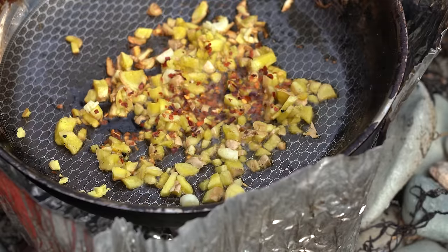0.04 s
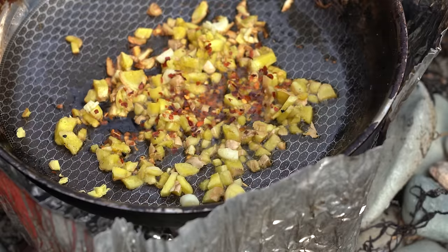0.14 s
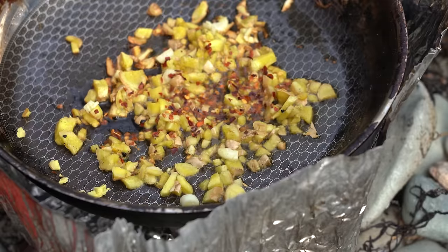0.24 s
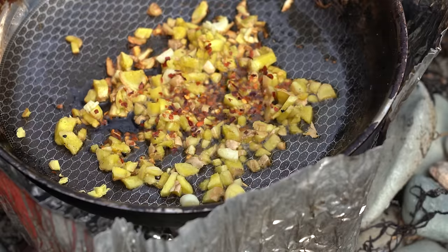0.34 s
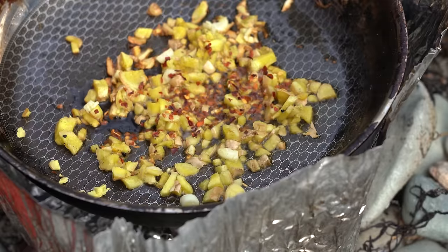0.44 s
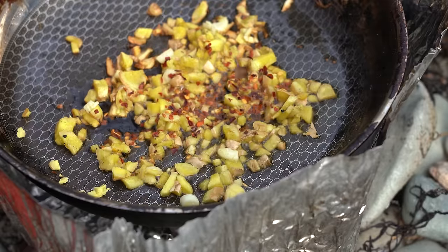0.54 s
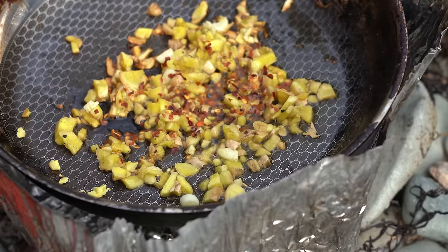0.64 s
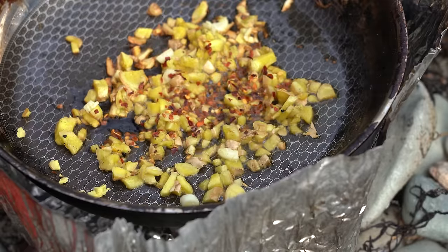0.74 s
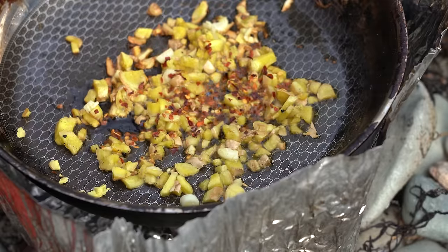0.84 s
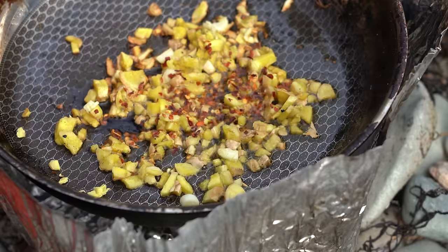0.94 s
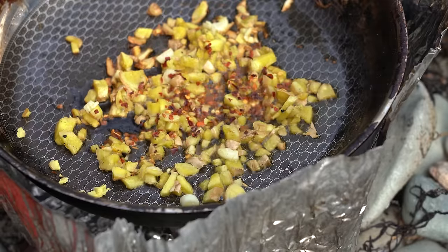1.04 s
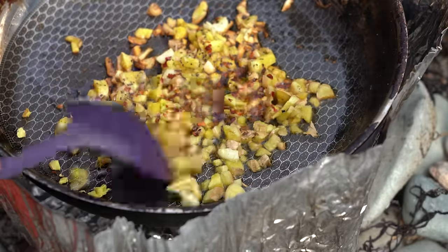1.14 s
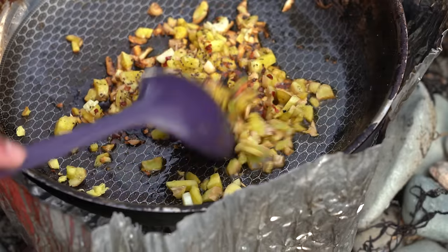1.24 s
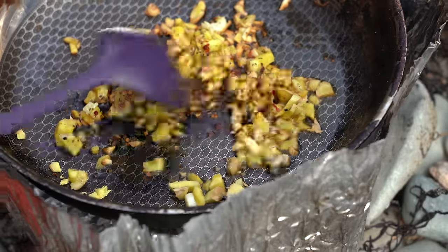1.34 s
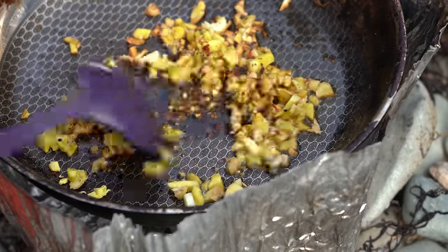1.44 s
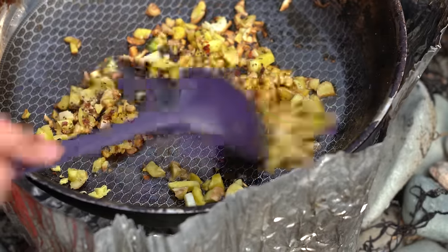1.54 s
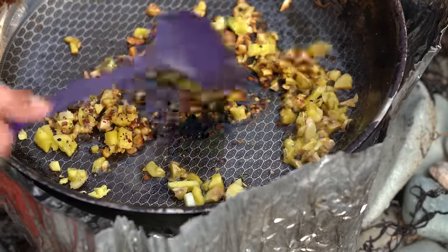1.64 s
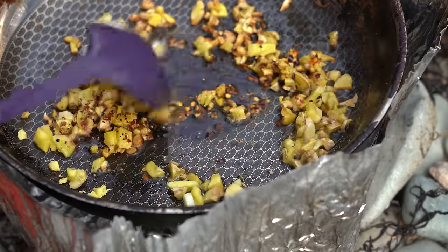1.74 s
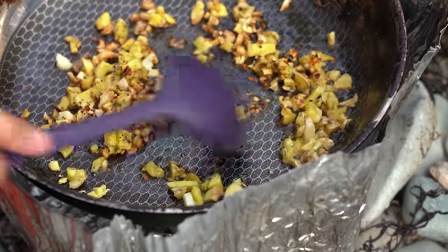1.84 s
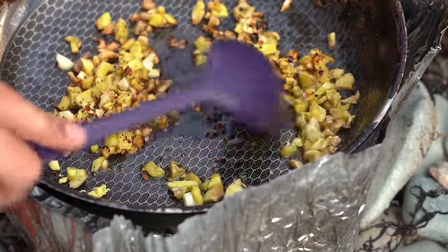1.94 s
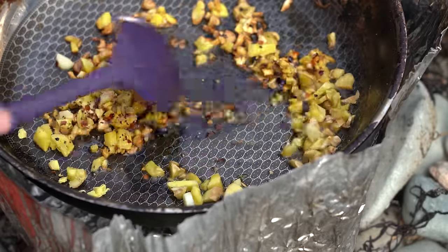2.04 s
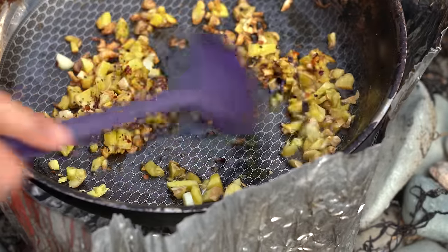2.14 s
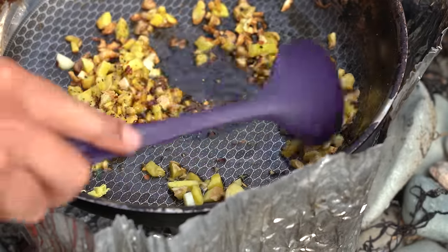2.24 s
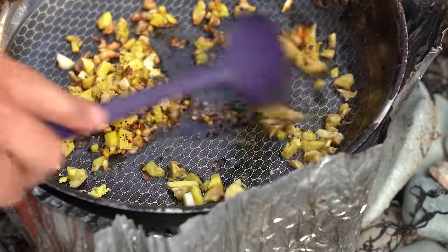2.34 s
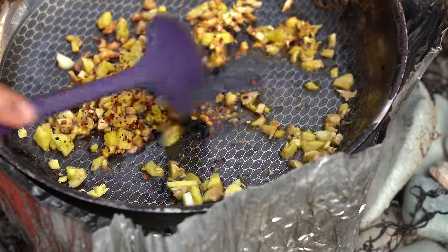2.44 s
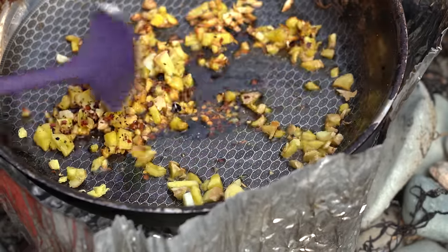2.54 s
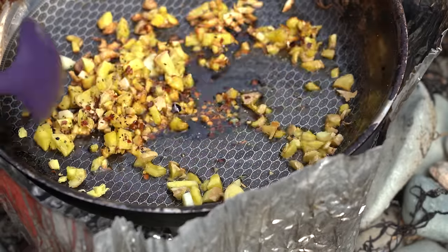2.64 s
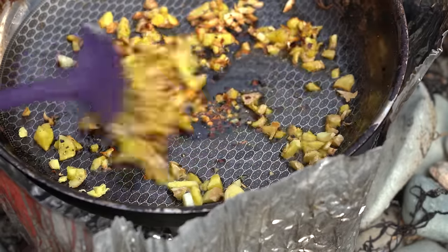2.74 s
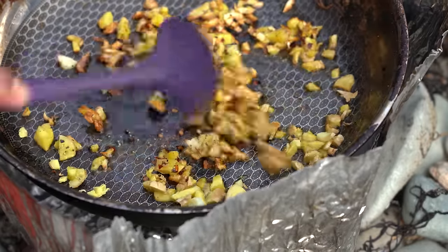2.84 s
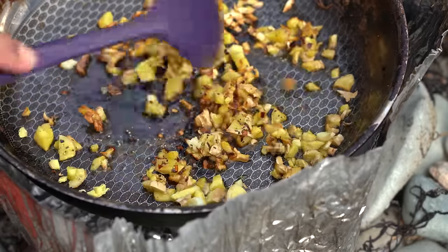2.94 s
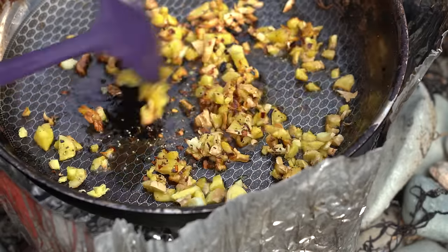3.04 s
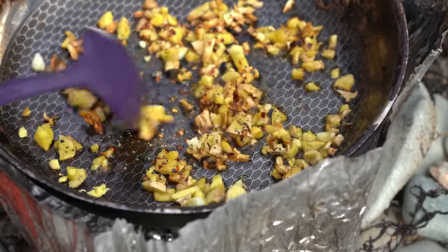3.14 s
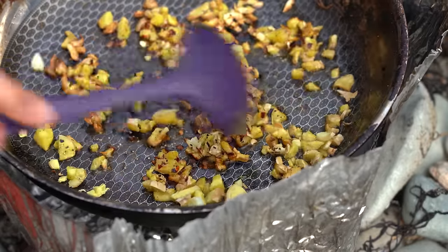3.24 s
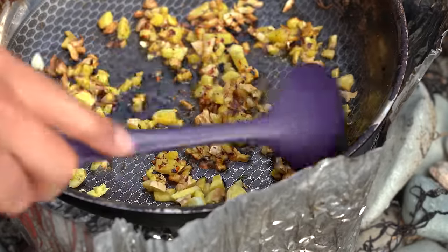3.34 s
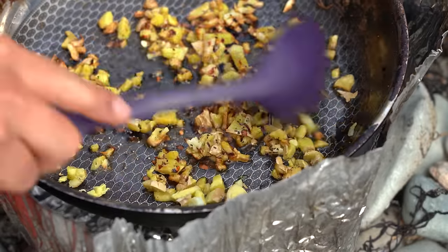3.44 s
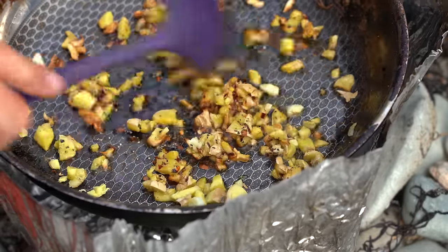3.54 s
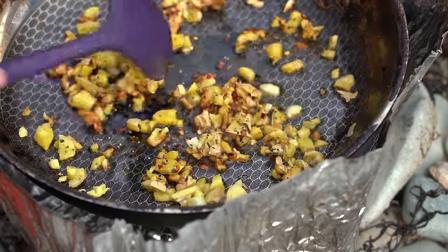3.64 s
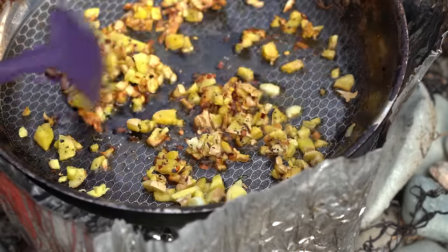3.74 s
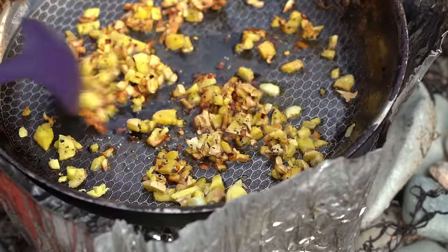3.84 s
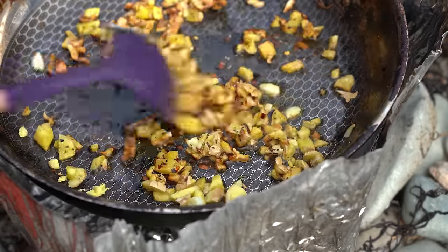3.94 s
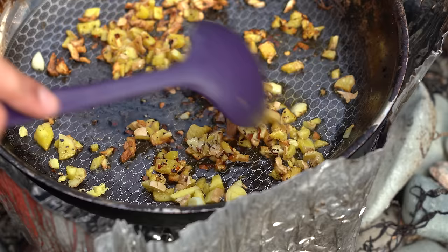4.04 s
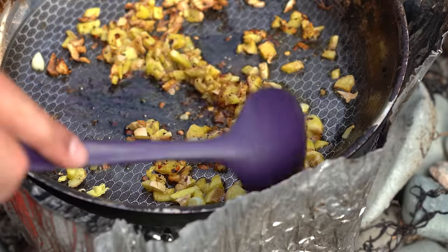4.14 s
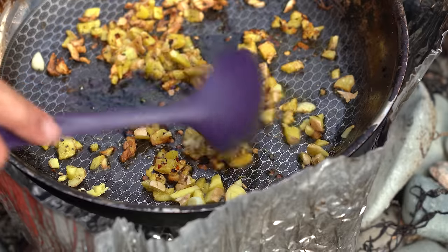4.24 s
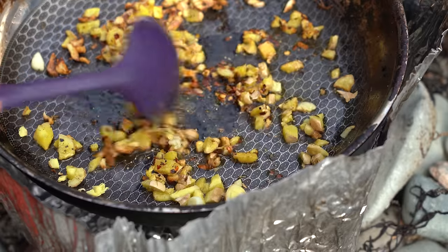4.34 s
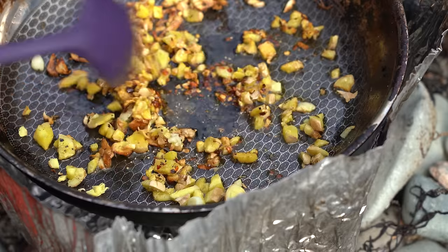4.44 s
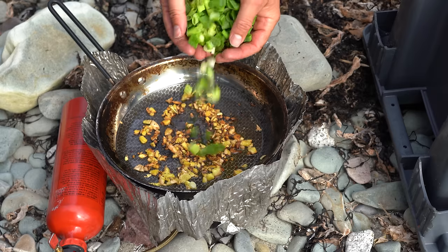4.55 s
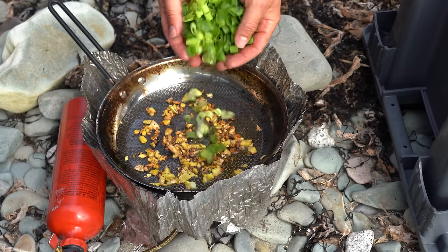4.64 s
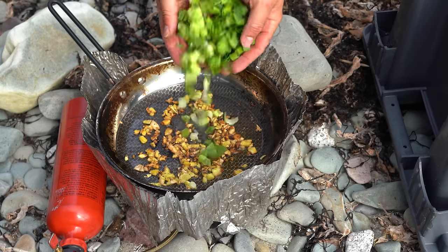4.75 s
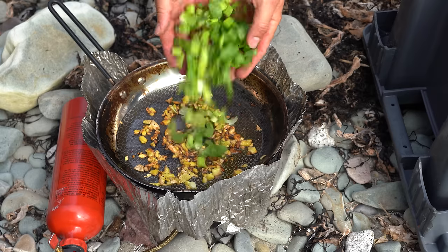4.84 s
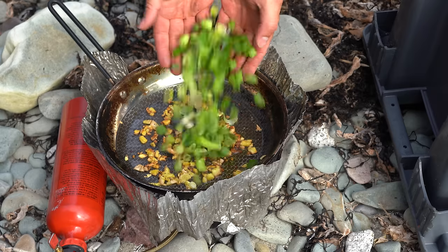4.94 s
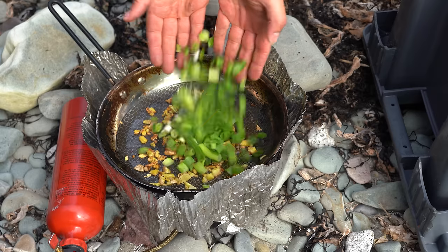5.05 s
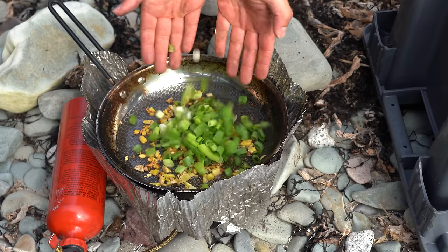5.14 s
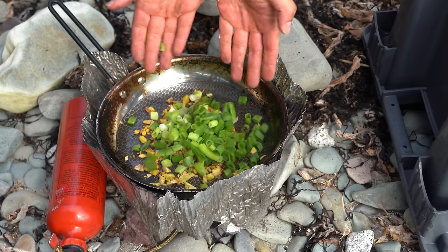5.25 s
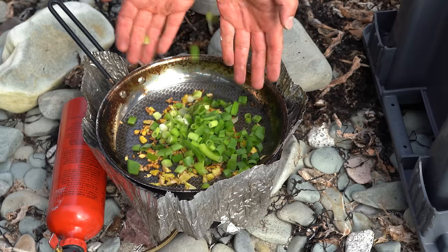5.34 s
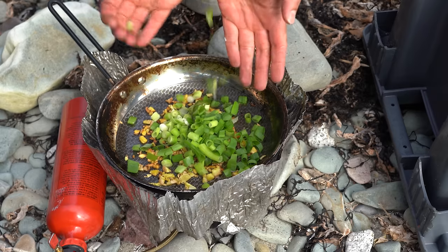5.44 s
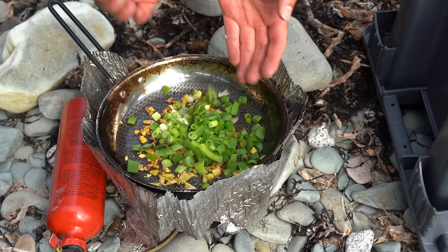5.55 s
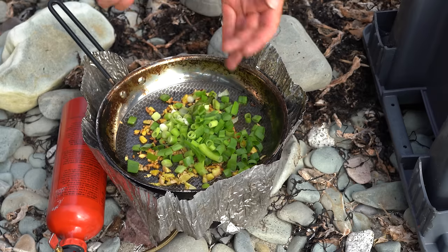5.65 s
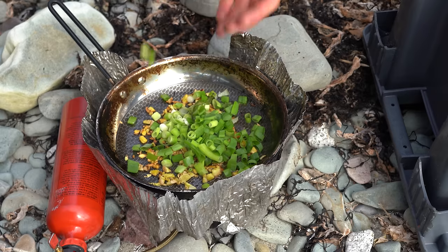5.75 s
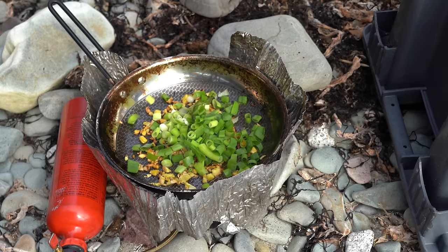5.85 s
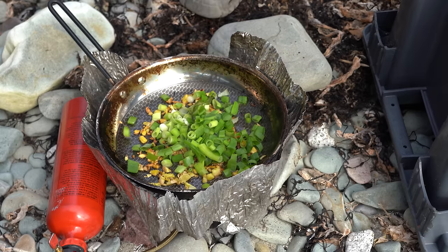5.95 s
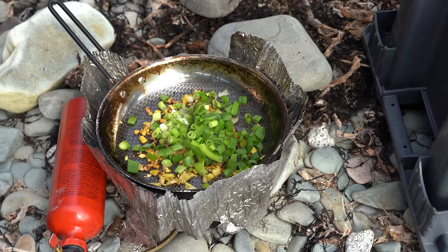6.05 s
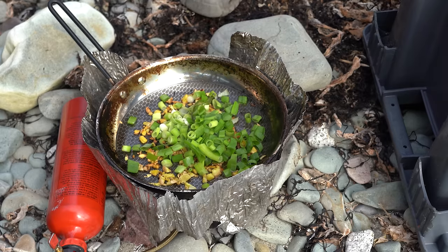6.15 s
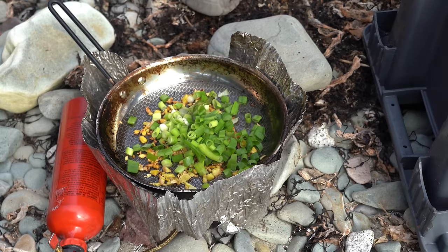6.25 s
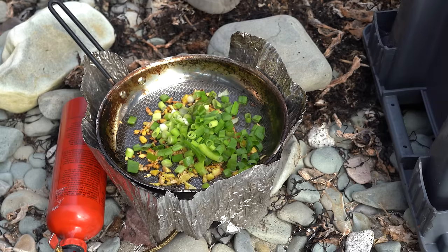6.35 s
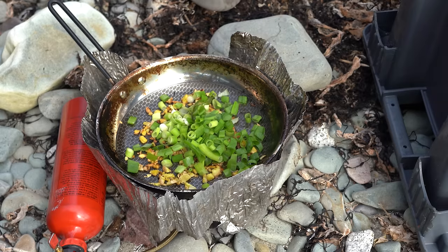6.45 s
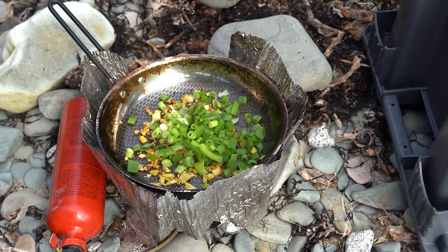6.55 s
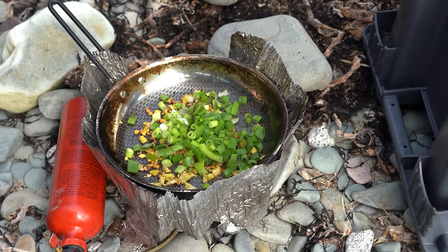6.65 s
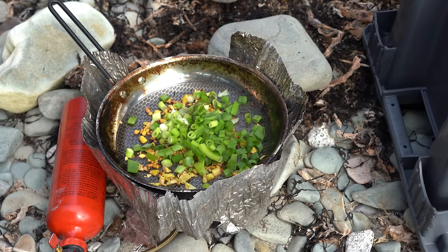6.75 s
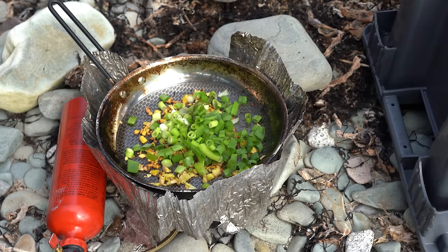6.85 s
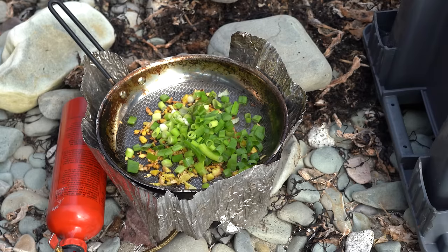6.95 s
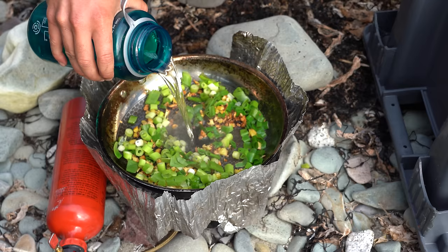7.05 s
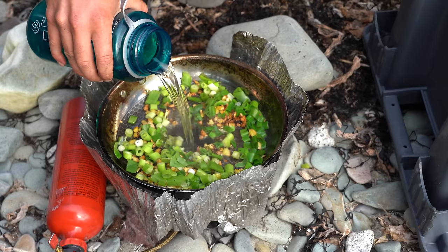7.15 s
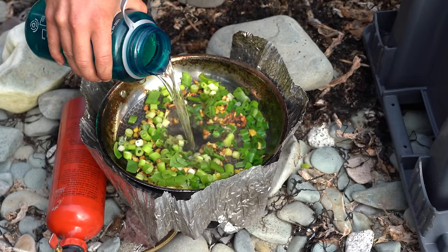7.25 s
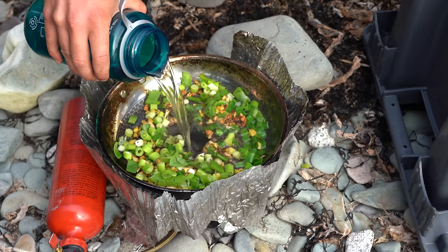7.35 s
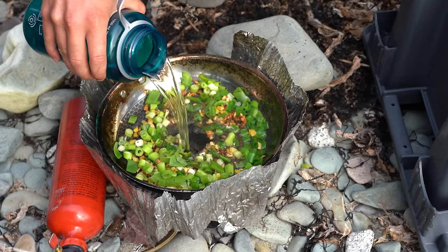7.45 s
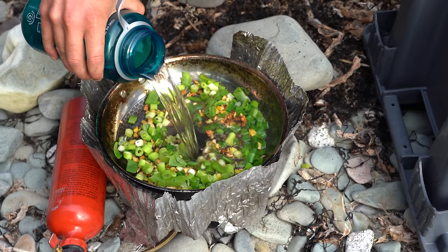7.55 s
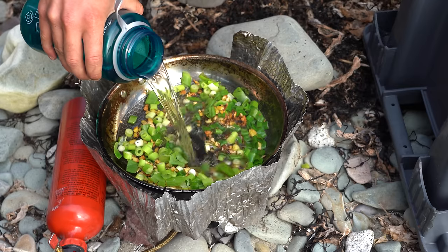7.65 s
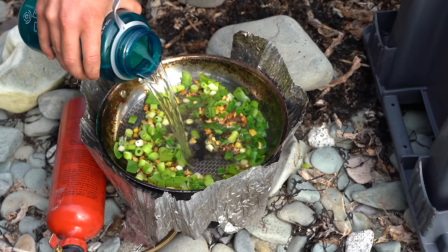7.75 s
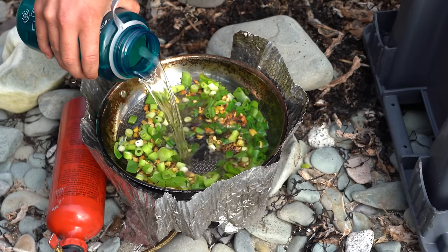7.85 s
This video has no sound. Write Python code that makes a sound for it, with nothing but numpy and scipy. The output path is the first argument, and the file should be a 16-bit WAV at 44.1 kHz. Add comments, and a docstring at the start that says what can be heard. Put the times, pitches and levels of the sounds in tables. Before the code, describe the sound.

Outdoors, close to a camp stove, chopped vegetables sizzle softly in a steel pan with small pops of oil, over the steady low roar of the flame. From about 1.2 to 4.4 seconds a plastic spoon stirs in quick strokes, knocking and scraping the textured pan so that it rings briefly. At about 4.7 seconds wet peppers drop in and the sizzle turns louder and brighter, full of sharp crackles, with one strong pop near 4.9 seconds. At about 7.1 seconds poured water hits the hot pan and flashes into a dense, louder hiss that lasts to the end, near 8 seconds. Light wind rumbles on the microphone throughout and gusts hardest in the last second. A small bird chirps faintly off to the left, a little more than once a second, over a very faint, wide, distant hum.

```python
"""Frying on a camp burner

Outdoors, close to the stove, a light wind on the microphone. Chopped vegetables fry in a steel pan
over a roaring flame, tiny bubbles bursting in the oil. A plastic spoon knocks and scrapes the textured
pan and sets it ringing. Wet peppers drop in and crackle, then poured water flashes to steam.
A small bird chirps some way off to the left, over a wide, distant hum."""
import sys
import numpy as np
from scipy import signal
from scipy.fft import rfft, irfft, next_fast_len
from scipy.io import wavfile

SR = 44100
rng = np.random.default_rng(int(sys.argv[2]) if len(sys.argv) > 2 else 0)


def to_wav(s):
    """Save 16-bit WAV."""
    ch = np.atleast_2d(s).T  # columns
    pcm = np.round(np.clip(ch, -1, 1) * 32767)  # PCM
    wavfile.write(sys.argv[1], SR, pcm.astype(np.int16))


N = 348831


def from_db(db):
    """Decibels to gain."""
    return 10 ** (np.asarray(db) / 20)


def unit_rms(x):
    """Scale to unit rms."""
    return x / np.sqrt(np.mean(x ** 2) + 1e-20)


def curves(rows, outside=None):
    """Join rows that begin with a time in seconds into one curve for each further column."""
    seconds, *columns = np.transpose(rows)
    return [np.interp(np.arange(N) / SR, seconds, column, outside, outside) for column in columns]


def colour(x, spectrum):
    """Shape by a spectrum joined on a log-frequency axis; unit rms."""
    size = next_fast_len(N)
    hz, db = np.transpose(spectrum)
    log_bins = np.log(np.arange(1, size // 2 + 2) * SR / size)
    gain = from_db(np.interp(log_bins, np.log(hz), db))
    return unit_rms(irfft(rfft(x, size) * gain, size)[:N])


def drift(rate_hz):
    """A slow random wander of unit spread."""
    step = 40
    r = np.exp(-2 * np.pi * rate_hz * step / SR)
    slow = signal.lfilter([1], [1, -2 * r, r * r], rng.standard_normal(N // step + 2002))[2000:]
    return np.interp(np.arange(N) / step, np.arange(len(slow)), unit_rms(slow))


def resonance(x, hz, width_hz):
    """Two-pole resonance with gain 1 at its peak."""
    r = np.exp(-np.pi * width_hz / SR)
    feedback = [1, -2 * r * np.cos(2 * np.pi * hz / SR), r * r]
    return signal.lfilter(np.array([1, 0, -1]) * (1 - r * r) / 2, feedback, x + 1e-18)


def clicks(per_s, uneven_db):
    """Random clicks of random sign, most small and a few large; unit rms."""
    sizes = from_db(uneven_db * np.minimum(rng.exponential(1, N), 3.6)) * rng.choice([-1, 1], N)
    return unit_rms(sizes * (rng.random(N) < per_s / SR))


def lift_lows(x, db, below_hz):
    """Raise or lower what lies under a frequency by a curve of dB."""
    lows = signal.sosfiltfilt(signal.butter(2, below_hz, fs=SR, output="sos"), x)
    return x + (from_db(db) - 1) * lows


def sizzle(levels, spectrum, wet_db, per_s, uneven_db, hiss_db, clump_db, patchy_db, octaves):
    """Tiny bubbles burst in clumps, each loud around a pitch of its own, over a fine hiss of steam."""
    bursts = clicks(per_s * from_db(clump_db * drift(25)), uneven_db)
    at = np.flatnonzero(bursts)
    log_pitch = rng.uniform(np.log2(600), np.log2(18000), N)[at]
    steam = rng.standard_normal((2, N))
    reach = octaves * from_db(rng.uniform(-10.5, 5.8, N)[at])   # the sharpest bursts spread widest
    edges_hz = np.geomspace(450, 19000, num=13)
    out = np.zeros(N)
    for k, (low, high) in enumerate(zip(edges_hz, edges_hz[1:])):
        drive = from_db(hiss_db + patchy_db * drift(42)) * steam[k % 2]
        octaves_off = np.log2(low * high) / 2 - log_pitch
        drive[at] += bursts[at] * np.exp(-(octaves_off / reach) ** 2)
        out += signal.sosfilt(signal.butter(2, [low, high], "band", fs=SR, output="sos"), drive)
    # wetness deepens the sizzle: wet_db lifts the lows at the start and at the end of the stage
    lows_db, = curves([(levels[0][0], wet_db[0]), (levels[-1][0], wet_db[1])])
    level_db, = curves(levels, outside=-120)
    return from_db(level_db) * lift_lows(colour(out, spectrum), lows_db, below_hz=2000)


# The sizzle at each stage, close to the microphone. Each row: time in seconds, level in dB.
OIL_LEVELS = [(0.0, -48.5), (1.3, -47.5), (2.0, -46), (2.96, -43.5), (3.21, -46), (3.45, -43),
              (4.05, -45.5), (4.66, -45.5)]
PEPPER_LEVELS = [(4.655, -57), (4.665, -37), (4.7, -36.5), (4.75, -41.5), (4.86, -40), (5.03, -33.5),
                 (5.2, -32.5), (5.4, -33.5), (5.55, -32.5), (5.82, -30), (6.0, -31), (6.3, -31.5),
                 (6.6, -34), (7.1, -34)]
WATER_LEVELS = [(7.09, -35), (7.11, -24.5), (7.17, -25), (7.27, -22.5), (7.5, -25.5), (7.6, -24),
                (7.91, -26)]
# The tone of each stage. Each row: frequency in Hz, relative level in dB.
OIL_SPECTRUM = [(470, -43), (800, -9), (852, -3), (989, -0.5), (1090, -3), (1970, -6), (2090, -4),
                (3950, -4), (6040, -6), (8460, -4.5), (10500, -14), (13800, -12.5), (15800, -23)]
PEPPER_SPECTRUM = [(470, -11), (800, -7.5), (1210, -6), (1890, -9), (2170, -1.5), (2460, -5.5),
                   (2860, -0.5), (6350, -1), (8050, 1.5), (9710, -4.5), (10600, -12.5), (13900, -8),
                   (15800, -19)]
WATER_SPECTRUM = [(290, -45), (500, -7), (522, -6.5), (1220, -0.5), (2180, 1.5), (2710, -2.5), (3570, 0),
                  (5580, -1.5), (6180, -3), (8370, 0.5), (10900, -12.5), (13900, -11), (15800, -22)]


def frying():
    """Hot oil, then wet peppers, then poured water: each stage bubbles faster than the last."""
    oil = sizzle(OIL_LEVELS, OIL_SPECTRUM, wet_db=(1.5, -1.5), per_s=600,
                 uneven_db=6.2, hiss_db=-6, clump_db=4, patchy_db=1, octaves=0.6)
    peppers = sizzle(PEPPER_LEVELS, PEPPER_SPECTRUM, wet_db=(1.5, 1), per_s=2500,
                     uneven_db=9, hiss_db=-9, clump_db=3, patchy_db=1.4, octaves=0.95)
    water = sizzle(WATER_LEVELS, WATER_SPECTRUM, wet_db=(-7, 5), per_s=5100,
                   uneven_db=6, hiss_db=-5, clump_db=1, patchy_db=1.2, octaves=0.85)
    return oil + peppers + water


# The loudest single bubbles of fat and water in the pan.
# Each row: start in seconds, level in dB, pitch in Hz, crack in dB relative to the ring.
BUBBLES = [(0.581, -25.5, 2000, -22), (0.809, -31, 1240, -5), (0.835, -29.5, 2220, -4.5),
           (0.8916, -21, 4900, -27), (1.0113, -16.5, 4200, -23), (2.172, -31.5, 3810, -0.5),
           (2.363, -24.5, 4360, -6), (2.8878, -19.5, 8250, -12), (3.1797, -22, 4250, -6.5),
           (3.243, -29.5, 2360, -2), (3.3672, -24, 2440, -7), (3.4147, -18, 7000, -17),
           (4.58, -11.5, 1440, -39), (4.6704, -11.5, 9580, -29), (4.7226, -11, 7400, -12),
           (4.785, -19, 7850, -18), (4.802, -17.5, 7380, -16), (4.8605, -21, 4440, -9),
           (4.8883, -16, 8160, -13), (4.9155, 2.5, 7650, -13), (4.999, -18, 6890, -19),
           (5.1018, -10, 7100, -14), (5.1653, -15, 3190, -17), (5.1961, -12.5, 5650, -10),
           (5.2294, -17, 8430, -11), (5.3137, -12.5, 2900, -21), (5.3582, -20, 8500, -6),
           (5.4088, -13, 3220, -18), (5.446, -15, 7200, -15), (5.4964, -13, 8220, -11),
           (5.5278, -13, 2920, -6.5), (5.5746, -16, 4490, -9), (5.6575, -11.5, 5600, -15),
           (5.6904, -15, 3010, -16), (5.7463, -11, 1550, -13), (5.7745, -5.5, 7720, -18),
           (5.8057, -12.5, 3880, -7.5), (5.9148, -13, 5080, -5), (6.0232, -14, 3320, -21),
           (6.2597, -16, 5740, -18), (6.3994, -11, 7760, -26), (6.4816, -20, 6830, -18),
           (6.5665, -19, 7750, -13), (6.6947, -17, 7600, -7), (6.7794, -24, 7870, -9),
           (6.8538, -18, 7760, -13), (6.8998, -14.5, 4000, -9), (6.9697, -15, 8090, -10),
           (6.9962, -13.5, 4030, -18), (7.262, -7, 8280, -13)]
# The tone of their crack. Each row: frequency in Hz, relative level in dB.
CRACK_SPECTRUM = [(500, -13), (1500, -9.5), (3000, 2), (6200, -5), (8200, 3), (9700, -13), (10600, -15),
                  (13900, -5), (16000, -32)]


def pops():
    """Each burst is a sharp crack, a ring of a few cycles and a dull thump in the pan."""
    length, ring_cycles = 600, 12.6   # samples in a pop, cycles to fall by 60 dB
    t = np.arange(length) / SR
    bright_noise = colour(rng.standard_normal(N), CRACK_SPECTRUM)[:length * len(BUBBLES)]
    thump = from_db(-26 - 60 * t / 0.019) * np.sin(2 * np.pi * 880 * t)
    out = np.zeros(N + length)
    for (start, db, hz, crack_db), noise in zip(BUBBLES, bright_noise.reshape(-1, length)):
        swell = 1 - np.exp(-t * hz / 0.22)   # the bubble opens within a cycle
        ring = swell * np.sin(2 * np.pi * hz * t) * from_db(-60 * t * hz / ring_cycles)
        crack = noise * from_db(crack_db - 60 * t / 0.015)
        out[round(start * SR):][:length] += from_db(db) * (ring + thump + crack)
    return out[:N]


# The spoon scraping the pan, close up; each list is a stretch of scraping. Each row: time in seconds,
# level in dB, hardness in dB per octave, zing of the sliding edge in dB above 6 kHz.
SPOON_SCRAPES = [
    [(1.2, -34, 7, 5), (1.206, -35, -1.5, 5), (1.22, -44, 6, -7), (1.296, -40.5, 2, -3),
     (1.31, -19.5, -0.5, 0), (1.334, -41, -1.5, 3.0), (1.342, -21, -5, 3.0), (1.4, -62, 8.5, -2)],
    [(1.425, -32, 5, 3.0), (1.429, -21, -5.5, 10), (1.455, -16.5, -2, 11), (1.493, -31.5, -0.5, 9),
     (1.503, -29, -10, 3.0), (1.513, -32, -8, 3.0), (1.52, -29, 4, 11)],
    [(1.522, -27, -0.5, 8), (1.544, -9.5, -3, 12), (1.59, -31, 1, 2), (1.596, -19, 0, -6),
     (1.628, -26, -1, 1), (1.64, -22, -3, 3.0)],
    [(1.641, -15.5, -1.5, -17), (1.741, -15.5, -2.5, 11.5), (1.803, -21, -2.5, 13), (1.813, -13, -13, 8),
     (1.825, -37, -1.5, 3.0), (1.859, -23.5, -0.5, 9), (1.89, -62, 9.5, 5)],
    [(1.954, -12.5, -0.5, -2), (2.0, -27.5, 0.5, 1), (2.024, -15.5, 1.5, -8), (2.048, -12, 0.5, 0),
     (2.066, -21, -1, 12), (2.084, -13, -5, 24), (2.124, -26.5, -5, 6), (2.14, -57, -1.5, 3.0)],
    [(2.397, -15.5, 1.5, -6), (2.433, -9, 0.5, -3), (2.453, -21.5, -1.5, 3.0), (2.477, -14.5, -6.5, 12),
     (2.509, -22, -3.5, 19.5), (2.527, -52, -14, 3.0), (2.55, -45, -5, 3.0)],
    [(2.71, -31, 4.5, 5), (2.724, -35, -1.5, 3.0), (2.754, -21, 2, 0.5), (2.77, -27, -3.5, 3.0),
     (2.78, -44, 5, 3.0), (2.796, -25.5, -2, 8), (2.838, -31, 0.5, 9.5), (2.9, -54, -1.5, 3.0)],
    [(3.04, -59, -1.5, 3.0), (3.046, -47, -10, 3.0), (3.074, -41, 2.5, 3.0), (3.09, -50, -1.5, 3.0),
     (3.118, -35, -9, 3.0), (3.15, -50, -1.5, 3.0)],
    [(3.47, -40, -7, 3.0), (3.486, -25, -1, 1), (3.504, -28, -0.5, -11), (3.584, -9, 0, -6),
     (3.634, -24, -3.5, 21), (3.638, -19, -6, 3.0), (3.686, -43, -10, 3.0), (3.69, -37, -1.5, 3.0)],
    [(3.88, -29, -7, 3.0), (3.886, -28, 0.5, 0), (3.928, -24, 1, 3.0), (3.988, -27, -5, 21),
     (3.996, -41, -6, 3.0), (4.02, -52, -1.5, 3.0)],
    [(4.21, -35.5, 6, -1), (4.228, -31.5, 5, 5), (4.252, -31, 2, -3), (4.342, -17.5, 1.5, -4),
     (4.352, -22.5, -1.5, 8), (4.388, -26, -6, 3.0), (4.42, -44, -5, 3.0)],
]
# The spoon strikes or catches. Each row: start in seconds, level in dB, hardness in dB per octave,
# favoured pitch in Hz, its lift in dB.
SPOON_KNOCKS = [(0.764, -17, -2.5, 930, 19), (0.802, -16.5, -13, 915, 12), (1.204, -14.5, 0, 610, 8.5),
                (1.246, -23, 8, 2120, 5), (1.274, -8.5, 2, 1610, -11), (1.306, -12, 0, 1680, -1),
                (1.342, -1.5, -6.5, 627, -2), (1.428, -24.5, 9.5, 630, 18), (1.453, -10, -8, 700, 16),
                (1.501, -18, -5, 620, 15), (1.541, -7, 2.5, 633, 2), (1.596, -6, 3.5, 904, 11),
                (1.656, 4.5, -1, 645, -15), (1.701, -11, -5, 620, 6), (1.722, 3, -3, 676, -2),
                (1.742, -3, 1.5, 615, 18), (1.855, -0.5, -26, 634, 10.5), (1.954, 6.2, 1, 660, 3.5),
                (2.02, -8.5, 4.5, 680, 0), (2.041, -21, 1.2, 676, 6), (2.08, 2, -17, 633, 12),
                (2.397, 9, 1, 596, -6), (2.425, 1.5, 4, 686, 9.5), (2.472, -6, -11, 643, 12),
                (2.702, -0.5, 3.5, 2940, 9.5), (3.485, -12.5, 4, 603, 4), (3.521, -7, 2.3, 638, 2),
                (3.541, -4, 4, 855, 6), (3.562, 3.5, -2.5, 611, -2), (3.575, 2.5, 2, 690, 12.5),
                (3.637, -9, -3, 645, 14.5), (3.866, 5.5, 1.8, 1224, 9.5), (3.914, -9.5, 3.5, 705, 3),
                (3.959, -4, -5, 594, -5), (4.21, -17, -10, 530, 8), (4.225, -11.5, -9, 530, 18.5),
                (4.308, 4.7, 2, 680, 2), (4.335, 5.5, -1.5, 636, -1)]
# The steel pan's resonances. Each row: frequency in Hz, width in Hz, gain in dB.
PAN_MODES = [(560, 50.6, -3), (655.7, 42.4, 3), (753, 33, -11.5), (741, 25, -6), (905, 52, -3.5),
             (1185, 64, -6.5), (1315, 175, -10), (1650, 150, -12), (2130, 157, -14), (2593, 140, -17.5),
             (2853, 58, -19), (3233, 154, -22), (3720, 75, -24), (4070, 230, -26), (5600, 850, -37),
             (6710, 160, -29), (8170, 480, -33), (9500, 240, -37), (12040, 620, -41)]


def spoon():
    """Slips over the ridges and single knocks ring the pan; harder contact lifts the upper modes."""
    scrape_db, hardness, zing_db = np.sum([curves(rows, outside=0) for rows in SPOON_SCRAPES], axis=0)
    _, widths, gains_db = np.transpose(PAN_MODES)
    # how loud the pan answers unit noise and a unit blow
    noise_rms = np.sqrt(np.sum(from_db(2 * gains_db) * np.pi * widths / SR))
    blow_peak = np.sum(from_db(gains_db) * 2 * np.pi * widths / SR)
    ridges = (scrape_db != 0) * clicks(per_s=1800, uneven_db=4)
    slips = ridges * from_db(scrape_db + 1.5 * drift(92)) / noise_rms
    starts, knock_db, knock_hardness, favoured_hz, lift_db = np.transpose(SPOON_KNOCKS)
    chance_db = rng.normal(0, 0.34, (len(starts), len(PAN_MODES)))
    # a knock is a blow and a few milliseconds of chattering contact
    samples = np.arange(200)
    contact = rng.standard_normal((len(starts), len(samples))) * from_db(-15 - 60 * samples / SR / 0.006)
    contact[:, 0] = 1
    knock_at = (starts * SR).astype(int)[:, None] + samples
    out = np.zeros(N)
    for k, (hz, width_hz, gain_db) in enumerate(PAN_MODES):
        octave = np.log2(hz / PAN_MODES[1][0])   # counted from the strongest mode
        edge_db = -1.54 * (1100 < hz < 3100) + zing_db * (hz > 6000)
        travel_db = 2.07 * drift(4.4)   # the moving contact feeds each mode now more, now less
        drive = slips * from_db(hardness * octave + edge_db + travel_db)
        favoured_db = lift_db * np.exp(-(np.log2(hz / favoured_hz) / 0.2) ** 2)
        soft_db = -2.26 * (hz / 6000) ** 2   # soft plastic dulls the top of a knock
        blow_db = knock_db + knock_hardness * octave + soft_db + favoured_db + chance_db[:, k]
        drive[knock_at] += contact / blow_peak * from_db(blow_db)[:, None]
        out += (-1) ** k * from_db(gain_db) * resonance(drive, hz, width_hz)
    # the small pan radiates no bass
    return signal.sosfilt(signal.butter(3, 500, "high", fs=SR, output="sos"), out)


# A faint whistle from the pan before the peppers go in. Each row: time in seconds, level in dB.
WHISTLE_LEVELS = [(0.0, -57), (0.22, -66), (0.48, -66), (0.6, -58), (0.95, -56), (1.5, -61), (3.15, -69),
                  (3.5, -53), (3.9, -66), (4.4, -62)]


def steam_whistle(hz=6640, width_hz=320):
    """Steam through a small gap: a breathy narrow band."""
    breath = resonance(rng.standard_normal(N), hz, width_hz)
    narrow = resonance(breath, hz, width_hz)
    level_db, = curves(WHISTLE_LEVELS, outside=-120)
    return from_db(level_db) * unit_rms(narrow)


# The flame just under the pan. Each row: time in seconds, level in dB.
FLAME_LEVELS = [(0.0, -38.5), (3.9, -40), (4.32, -39), (6.6, -40), (6.87, -38.5), (7.91, -42.5)]
# The tone of its roar. Each row: frequency in Hz, relative level in dB.
FLAME_SPECTRUM = [(90, -19.5), (180, -6), (340, -1.5), (540, -5.5), (690, -9), (780, -18.5), (1500, -47)]


def burner():
    """The flame roars: low noise with a slight, quick flutter."""
    level_db, = curves(FLAME_LEVELS)
    return from_db(level_db + 0.47 * drift(23)) * colour(rng.standard_normal(N), FLAME_SPECTRUM)


# Wind right on the microphone. Each row: time in seconds, level in dB, lift of the deepest rumble in dB.
GUSTS = [(0.0, -38, 11.5), (0.07, -42, 13), (0.17, -43.5, 9), (0.62, -48, 4), (0.72, -44, 4),
         (1.09, -54, -3), (1.19, -38.5, 3.5), (1.7, -41, 8.5), (1.82, -35, 4.5), (2.25, -42.5, 5),
         (2.95, -42.5, 13), (3.53, -48, 4), (3.72, -37, 9.5), (4.36, -37.5, 4.5), (4.58, -53, 10),
         (5.75, -48, 1.5), (5.93, -38.5, 5.5), (6.85, -32, 2), (7.27, -24.5, 4.5), (7.38, -26.5, 1.5),
         (7.91, -32.5, 5.5)]
# The tone of the rumble. Each row: frequency in Hz, relative level in dB.
WIND_SPECTRUM = [(14, -9), (24, 0), (38, -1.3), (55, -7), (85, -6), (130, -9.5), (250, -21.5), (330, -55)]


def wind():
    """Air buffets the microphone with a rumble that swells and deepens in gusts."""
    level_db, depth_db = curves(GUSTS)
    gain = from_db(level_db + 0.93 * drift(10))
    rumble = colour(rng.standard_normal(N), WIND_SPECTRUM)
    return gain * lift_lows(rumble, depth_db, below_hz=55)


# A small bird some way off to the left. Each row: start in seconds, level in dB, pitch factor.
BIRD_CALLS = [(.37, -49, 1), (1.19, -51, 0.94), (2.05, -50, .94), (2.975, -48, 0.99), (3.88, -52, 0.94),
              (4.58, -45.5, 0.95), (5.27, -49, 1), (6.02, -51, 0.99), (6.76, -49, 0.97), (7.52, -52, 0.94)]
# Its one chirp, a high note that breaks and falls.
# Each row: seconds into the chirp, pitch in Hz, relative level in dB.
CHIRP_SHAPE = [(0, 4400, -25), (.02, 4600, -6), (.045, 4600, 0), (.055, 4300, -24), (.07, 3800, -20),
               (.085, 3950, -3), (.1, 3700, 0), (.118, 3400, -5), (.13, 3250, -30)]


def bird():
    """A warbling near-sine, smeared by scattered echoes that differ left and right."""
    seconds, hz, db = np.transpose(CHIRP_SHAPE)
    t = np.arange(round(seconds[-1] * SR)) / SR
    warble = 1 + np.where(t < 0.06, 0.028, 0.06) * np.sin(2 * np.pi * 230 * t)   # rougher second half
    song = np.zeros(N)
    for start, level_db, pitch_factor in BIRD_CALLS:
        phase = 2 * np.pi * np.cumsum(pitch_factor * warble * np.interp(t, seconds, hz)) / SR
        song[round(start * SR):][:len(t)] += from_db(level_db + np.interp(t, seconds, db)) * np.sin(phase)
    echo_t = np.arange(SR // 2) / SR
    echoes = rng.standard_normal((2, len(echo_t))) * from_db(-24 - 60 * echo_t / 0.31)
    echoes[:, 0] = from_db(8.5), -from_db(-1)   # the direct path arrives out of step on the right
    return signal.fftconvolve(song[None], echoes, axes=1)[:, :N]


# The outdoors, far from the microphone on both sides. Each row: frequency in Hz, relative level in dB.
DISTANCE_SPECTRUM = [(88, -47), (150, -10), (269, -12), (565, 5), (654, -2), (1060, -4.5), (1240, -5.5),
                     (2200, -23), (2860, -58), (4840, -120)]


def far_hum():
    """A wide, gently wavering hum: unrelated noise in each channel."""
    gain = from_db(-66.5 + 0.4 * drift(7.7))
    return gain * np.array([colour(rng.standard_normal(N), DISTANCE_SPECTRUM) for side in "LR"])


def scene():
    """Stove and wind sit dead centre; bird and distance are wide."""
    centre = wind() + burner() + frying() + spoon() + pops() + steam_whistle()
    return centre + bird() + far_hum()


def record(dry):
    """The recorder clips overloads and cuts the treble above 15.9 kHz."""
    top_cut = signal.ellip(10, 0.5, 60, 15900, fs=SR, output="sos")
    return signal.sosfilt(top_cut, np.clip(dry, -1, 1))


dry = scene()
out = record(dry)
to_wav(out)
```